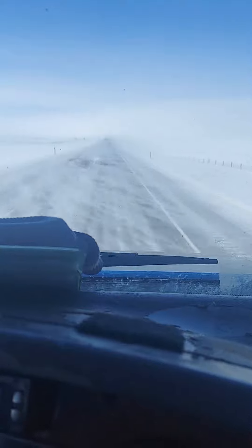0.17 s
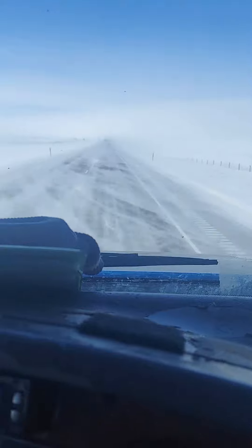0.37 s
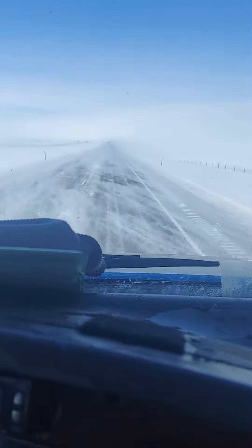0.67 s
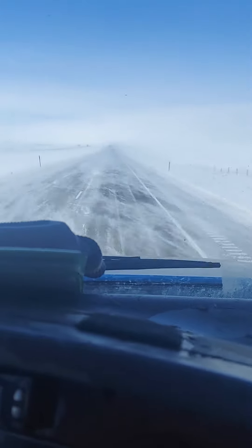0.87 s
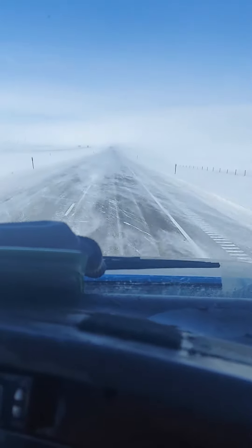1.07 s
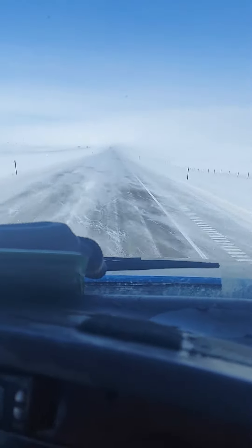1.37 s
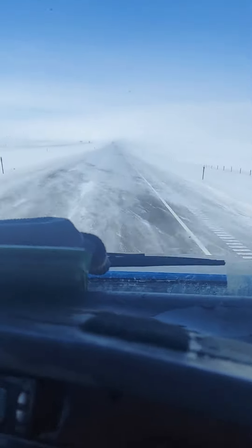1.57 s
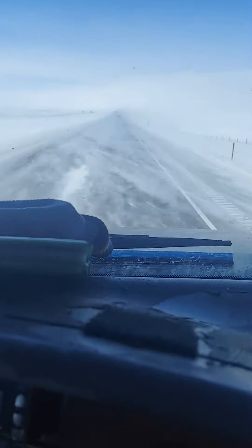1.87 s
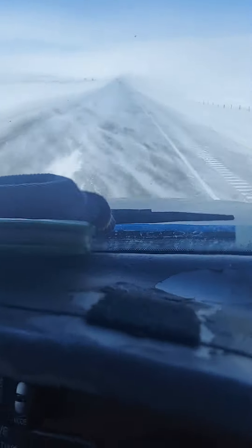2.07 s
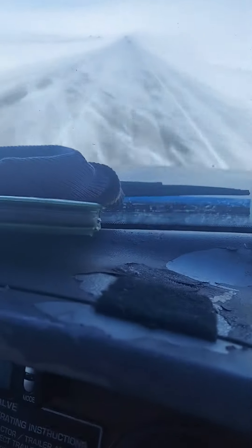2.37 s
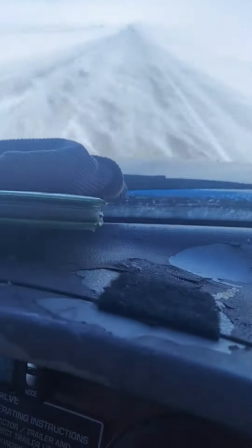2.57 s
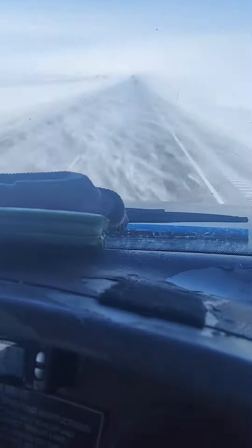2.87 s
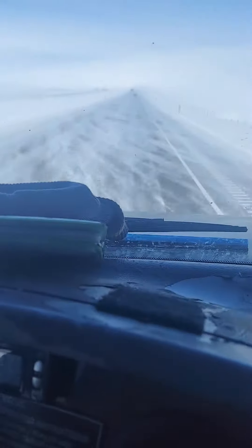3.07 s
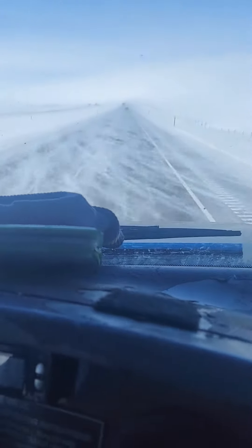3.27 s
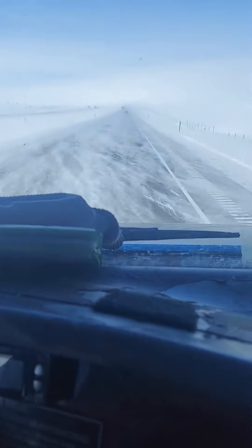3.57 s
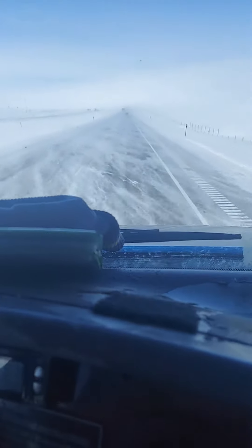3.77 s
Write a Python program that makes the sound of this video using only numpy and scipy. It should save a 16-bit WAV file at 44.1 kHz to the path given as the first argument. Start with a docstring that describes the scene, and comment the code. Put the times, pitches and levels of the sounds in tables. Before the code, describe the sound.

A truck's diesel engine drones steadily from the start, heard inside the cab with low tyre rumble and a softer rush of wind and snow. From about 1.6 seconds, loose plastic ticks lightly and irregularly, mostly on the right. The wind swells slightly near 1.9 seconds, and one dull dashboard knock follows around 2.2. The ticking stops just after 3 seconds, while the driving noise continues to about 4.

```python
"""Inside a truck cab, driving through blowing snow. From the start a six-cylinder diesel drones and
slowly loses speed, tyres rumble through the floor, and wind and snow rush round the windscreen.
At 1.6 seconds loose plastic near the right microphone begins to tick and rattle as it slips.
A gust swells near 1.9 seconds, and one dull knock on the dashboard follows. Just after 3 seconds
the ticking stops, while the engine, tyres and wind carry on."""
import sys
import numpy as np
from scipy import signal
from scipy.fft import rfft, irfft, next_fast_len
from scipy.io import wavfile
from scipy.ndimage import uniform_filter1d, map_coordinates

SR = 44100
rng = np.random.default_rng(int(sys.argv[2]) if len(sys.argv) > 2 else 0)


def store_pcm(level_fs):
    """Save levels as 16-bit WAV."""
    pcm = np.round(np.clip(level_fs, -1, 1) * 32767).astype(np.int16)
    wavfile.write(sys.argv[1], SR, np.atleast_2d(pcm).T)


N = 172872

# How fast the engine's crankshaft spins. Each row: time in seconds, turns per second.
CRANK_SPEED = [(0.3, 21.6), (1.5, 21.42), (2.7, 21.29), (3.9, 21.17)]
# How loud the engine's main drone is. Each row: time in seconds, level in dB.
DRONE_LEVEL = [(0.13, -11.5), (0.37, -12), (0.6, -13.5), (1.6, -14), (2.3, -15.3), (3.2, -15.5), (3.9, -13)]
# The engine's weaker tones. Each row: multiple of the crank speed, relative level in dB.
ENGINE_TONES = [(3.5, -26), (4.5, -14.5), (5, -11.5), (5.5, -23.5), (6, -23), (7, -15), (7.5, -18.5),
                (8, -26), (9, -19), (9.5, -24.5), (11, -23), (12, -21.5), (13, -36), (15, -42), (16, -24.5),
                (17, -34), (22.5, -30), (24, -32), (25, -38), (28.5, -36.5)]
# How loud the tyres, wind and snow are. Each row: time in seconds, level in dB.
TYRE_LEVEL = [(0.13, -13.5), (0.35, -15.5), (0.6, -22), (1.3, -21.5), (1.7, -22.5), (2.15, -20.5),
              (2.4, -24.5), (3.4, -23.5), (3.9, -19.5)]
WIND_LEVEL = [(0.13, -26), (0.35, -28.5), (0.6, -31.5), (0.9, -33.5), (1.2, -33), (1.5, -33), (1.9, -30.5),
              (2.17, -33), (2.3, -33.5), (3.1, -35), (3.5, -34), (3.9, -33)]
SNOW_LEVEL = [(0.13, -48), (0.35, -49.5), (0.7, -55), (1.5, -53), (1.9, -51.5), (2.3, -54.5), (3.9, -54)]
# Their mix of low and high sound. Each row: frequency in Hz, relative level in dB.
TYRE_SPECTRUM = [(15, -28), (27, -19.5), (40, -3.5), (52, 5), (66, 0.5), (80, -1), (105, -2), (160, -1),
                 (200, -7), (260, -10.5), (330, -21.5), (500, -28), (1200, -70)]
WIND_SPECTRUM = [(150, -30.5), (300, 0), (400, 0.5), (490, 0.5), (600, -3), (780, -7.5), (980, -5.5),
                 (1150, -7.5), (1400, -11.5), (2200, -16.5), (3100, -26.5), (5000, -36.5), (9000, -70)]
SNOW_SPECTRUM = [(1200, -28), (3000, 0), (4500, 0.5), (6100, -5), (7600, -4), (9800, -13.5), (12300, -7),
                 (14200, -12.5), (15500, -13), (16500, -27)]
# How alike the noise is on both sides. Each row: frequency in Hz, likeness (0 none, 1 or more full).
STEREO_LIKENESS = [(60, 0.5), (130, 1.07), (290, 0.45), (640, .5), (1400, 0.06), (3000, 0), (15000, 0)]
# Which side the noise is louder on. Each row: frequency in Hz, left minus right in dB.
STEREO_BALANCE = [(60, -1.5), (110, 2.5), (380, -3.5), (700, 0.5), (1300, -5), (2400, -2), (4400, -0.5),
                  (15000, 0.5)]
# The slips of the plastic. Each row: start in seconds, gain in dB, brightness in dB per octave,
# left minus right in dB at 6000 Hz, ringing frequency in Hz, length of the slip in seconds.
PLASTIC_SLIPS = [(1.6105, -34.5, -1, -14.5, 6270, .0012), (1.621, -34.5, -1, -8, 4170, .0004),
                 (1.6285, -42, -1, -3, 14100, 0.0013), (1.657, -45, -6, -4, 5000, .0005),
                 (1.7035, -43, -4.5, -4, 5500, .0005), (1.7797, -32, -3.5, 4, 4600, 0.00022),
                 (1.7955, -34, -2, -3, 4400, .0002), (1.7998, -39.5, -1, 2.5, 7000, .0004),
                 (1.8087, -33.5, -2, -1, 4500, .0003), (2.0249, -24.5, -1.6, -9, 4000, .001),
                 (2.1457, -27, 1, -8.5, 5760, 0.0011), (2.1626, -27.5, -5, -7.5, 3600, 0.00028),
                 (2.1878, -32, -3.5, -7.5, 8040, .001), (2.2311, -30, -0.5, -10.5, 7800, .0012),
                 (2.2392, -29, -0.5, -12.5, 3830, .0012), (2.3698, -31, -2.5, -4, 4600, 0.002),
                 (2.4005, -42, -6, -15, 6000, 0.00088), (2.4277, -21.5, .5, -12.5, 5700, 0.00072),
                 (2.4784, -31, -1.5, -15, 5800, 0.0015), (2.5358, -31.5, 1, -14.5, 5530, 0.0009),
                 (2.6287, -29.5, 2, -11.5, 7000, .001), (2.648, -35.5, -9, -17, 3800, 0.0011),
                 (2.7, -38, -1.5, -6, 3300, .001), (2.7313, -42.5, -5, -14, 3500, .001),
                 (2.7603, -30, .5, -12, 8200, .001), (2.898, -32.5, -3, -4.5, 6000, 0.0012),
                 (2.9645, -44.5, -0.5, 2, 12000, .001), (3.0217, -37, 2, 0, 8100, 0.0015),
                 (3.086, -32, -7.5, -11.5, 2620, 0.0013), (3.121, -43, -1, -5, 3800, 0.00089)]
# The tone that all ticks share. Each row: frequency in Hz, relative level in dB.
PLASTIC_SPECTRUM = [(500, -25), (1500, -2.5), (3000, 0.5), (4000, 3), (4900, -1), (5700, 0.5), (6500, -3),
                    (8000, 0.5), (10300, -11.5), (11600, -3), (13000, -1), (14000, -7.5), (15500, -6),
                    (17000, -24)]
# The knock's tones. Each row: frequency in Hz, relative level in dB, seconds to fade by 60 dB.
KNOCK_TONES = [(188, 7.5, 0.022), (330, -3, .02), (484, -9.5, 0.035), (805, -6, 0.01), (1290, -8, 0.0071)]

FIRINGS_PER_TURN = 3  # six cylinders each fire once in two turns


def gain(db):
    """Turn decibels into a number to multiply by."""
    return 10 ** (np.asarray(db) / 20)


def normalise(x):
    """Scale x to an average (rms) size of 1."""
    return x / np.sqrt(np.mean(x ** 2) + 1e-20)


def over_frequency(rows, hz):
    """Read a table at the given frequencies, spaced like musical pitch."""
    frequencies, values = np.transpose(rows)
    return np.interp(np.log(hz + 1), np.log(frequencies + 1), values)


def over_time(rows):
    """Read a table of times and values at every sample."""
    return np.interp(np.arange(N) / SR, *np.transpose(rows))


def wobble(rate):
    """A smooth curve through `rate` random values a second."""
    return map_coordinates(rng.standard_normal(2048), [np.arange(N) * rate / SR + 2], mode="mirror")


def filtered(x, response):
    """Multiply each frequency in x by response(hz)."""
    size = next_fast_len(N + SR // 2)
    return irfft(rfft(x, size) * response(np.fft.rfftfreq(size, 1 / SR)), size)[..., :N]


def pan(balance_db):
    """Left and right gains; a positive balance is louder on the left."""
    return gain(np.array([[.5], [-.5]]) * balance_db)


def rushing_noise(spectrum, patchy_db):
    """Stereo noise with the given spectrum and small random loud and quiet patches."""
    def shared_and_opposite(hz):
        width = np.arccos(np.clip(over_frequency(STEREO_LIKENESS, hz), -1, 1)) / 2
        return gain(over_frequency(spectrum, hz)) * [np.cos(width), np.sin(width)]

    slices = signal.stft(rng.standard_normal((2, N)), nperseg=512)[2]
    patches = uniform_filter1d(rng.standard_normal(slices.shape[1:]), size=6, axis=0)  # across pitch
    patches = normalise(uniform_filter1d(patches, size=10, axis=1))  # across time
    noise = signal.istft(slices * gain(patchy_db * patches), nperseg=512)[1][:, :N]
    shared, opposite = filtered(noise, shared_and_opposite)
    stereo = np.array([shared + opposite, shared - opposite])
    return normalise(filtered(stereo, lambda hz: pan(over_frequency(STEREO_BALANCE, hz))))


def engine(crank_angle, tones_db=-15.5, waver_db=0.2, rough_db=1.82, drift_radians=.18):
    """The firing cylinders make a steady drone, with weaker, less steady tones above it."""
    level = gain(over_time(DRONE_LEVEL) + waver_db * wobble(14))
    sound = level * np.sin(FIRINGS_PER_TURN * crank_angle) * pan(-1.2)
    for multiple, db in ENGINE_TONES:
        phase = multiple * crank_angle + rng.uniform(0, 2 * np.pi) + drift_radians * wobble(6)
        spread = np.array([[1], [-1]]) * 0.017 * multiple  # puts left and right out of step
        sound += gain(tones_db + db + rough_db * wobble(7)) * np.sin(phase + spread)
    return np.sqrt(2) * sound


def tyres(bumpy_db=1.1):
    """Tyres roll over the rough road and rumble through the floor."""
    level = gain(over_time(TYRE_LEVEL) + bumpy_db * wobble(18))
    return level * rushing_noise(TYRE_SPECTRUM, patchy_db=-0.34)


def wind_and_snow(crank_angle, flutter_db=0.42, swirl_db=1):
    """Air and snow rush round the cab, fluttering as they swirl and throbbing with each firing."""
    throb = 1 + 0.055 * np.sin(FIRINGS_PER_TURN * crank_angle)
    shake = gain(flutter_db * wobble(12) + swirl_db * wobble(150)) * throb
    air = gain(over_time(WIND_LEVEL)) * rushing_noise(WIND_SPECTRUM, patchy_db=0.83)
    snow = gain(over_time(SNOW_LEVEL)) * rushing_noise(SNOW_SPECTRUM, patchy_db=1.64)
    return shake * air + np.sqrt(shake) * snow


def plastic_ticks(rise_s=0.00021, fade_s=0.008, echo_db=-21, echo_s=0.063, ring_db=4.5):
    """Each slip of the loose plastic is a tiny scrape, followed by a faint echo from the cab."""
    size, lead = 4096, 128  # samples in one tick, and how many come before its start
    t = np.maximum(np.arange(size) - lead, 0) / SR
    hz = np.fft.rfftfreq(size, 1 / SR)
    pitch_ratio = np.maximum(hz, 1500) / 6000
    shadow = pitch_ratio ** 0.26  # the far microphone loses the high notes most
    rise = np.minimum(t / rise_s, 1)
    echo = gain(echo_db - 60 * t / echo_s)
    plastic_db = over_frequency(PLASTIC_SPECTRUM, hz)
    sound = np.zeros((2, N + size))
    for start_s, db, brightness, balance_db, ring_hz, slip_s in PLASTIC_SLIPS:
        scrape = gain(-60 * np.maximum(t - slip_s, 0) / fade_s)
        burst = rise * (scrape + echo) * rng.standard_normal((2, size))
        octaves_away = np.log2((hz + 1) / ring_hz)
        peak_db = ring_db / (1 + (octaves_away / 0.079) ** 2)  # a narrow boost where this tick rings
        tone = normalise(gain(plastic_db + peak_db + brightness * np.log2(pitch_ratio)))
        tick = irfft(rfft(burst) * tone * pan(balance_db * shadow))
        start = round(start_s * SR) - lead
        sound[:, start:start + size] += gain(db) * tick
    return sound[:, :N]


def dashboard_knock(start_s=2.1632, ring_db=-12.5, shudder_db=-29, shudder_s=0.017):
    """One dull bump rings the dashboard; the panel shudders just before and after it."""
    t = np.arange(N) / SR - start_s
    age = np.maximum(t, 0)
    ring = sum(gain(db - 60 * age / fade_s) * np.sin(2 * np.pi * hz * age)
               for hz, db, fade_s in KNOCK_TONES)
    shudder = np.exp(-.5 * (t / shudder_s) ** 2) * rushing_noise(WIND_SPECTRUM, patchy_db=1)
    return pan(-3) * (gain(ring_db) * ring + gain(shudder_db) * shudder)


def scene():
    """Add up all the sounds in the cab."""
    crank_angle = 2 * np.pi * np.cumsum(over_time(CRANK_SPEED)) / SR
    driving = engine(crank_angle) + tyres() + wind_and_snow(crank_angle)
    return driving + plastic_ticks() + dashboard_knock()


def record(dry, start_s=0.12, full_bass_s=0.334, fade_s=0.026, top_hz=16400, left_early_s=.00012):
    """After a short silence the sound fades in, thin at first; the left microphone hears it sooner."""
    def fade_in(at_s):
        return np.clip((np.arange(N) / SR - at_s) / fade_s, 0, 1)

    def cut_bass(x, hz):
        return signal.sosfilt(signal.butter(2, hz, "highpass", fs=SR, output="sos"), x)

    opened = dry * fade_in(start_s)
    fullness = fade_in(full_bass_s)
    sound = (1 - fullness) * cut_bass(opened, hz=88) + fullness * cut_bass(opened, hz=33)
    shift_s = np.array([[.5], [-.5]]) * left_early_s
    return filtered(sound, lambda hz: (hz < top_hz) * np.exp(2j * np.pi * hz * shift_s))


dry = scene()
out = record(dry)
store_pcm(out)
```